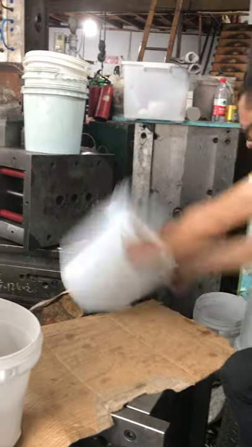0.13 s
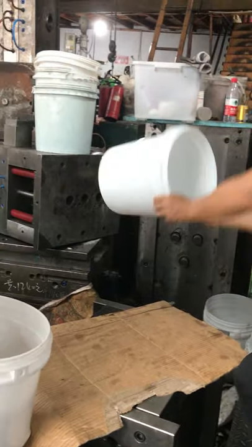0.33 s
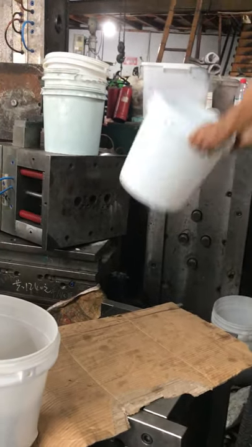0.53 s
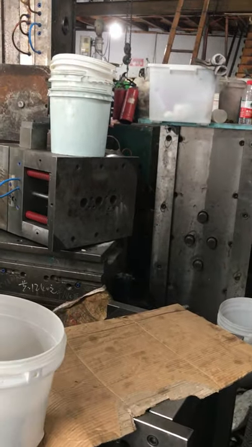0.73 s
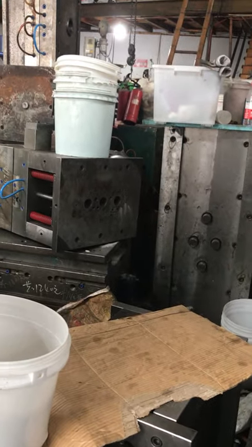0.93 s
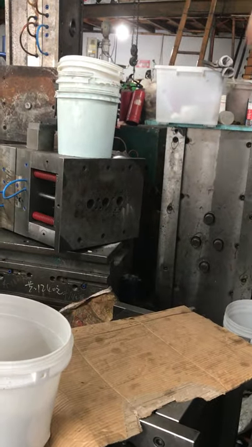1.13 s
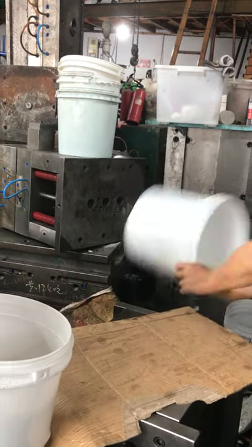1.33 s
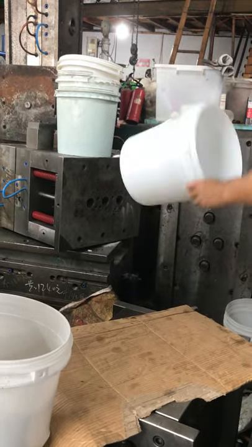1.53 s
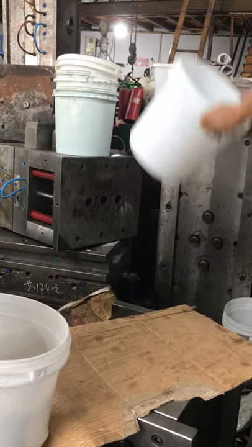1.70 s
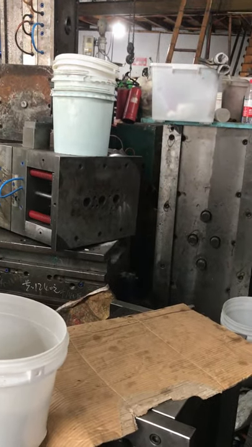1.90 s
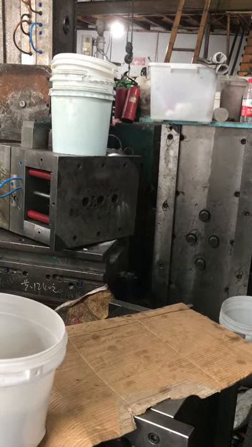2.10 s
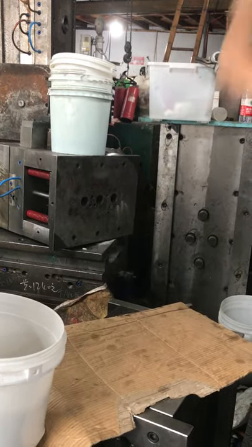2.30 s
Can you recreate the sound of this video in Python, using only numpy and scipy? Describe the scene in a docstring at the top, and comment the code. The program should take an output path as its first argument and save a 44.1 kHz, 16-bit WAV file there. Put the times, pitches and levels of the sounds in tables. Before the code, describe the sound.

An empty plastic bucket slams twice on a card-covered steel bench, each hit a sharp crack, clatter and hollow boom with a quick second bump, close to the microphone in a large, echoing workshop with humming machines.

```python
"""A plastic bucket is slammed twice on a card-covered steel bench in a large workshop. On each slam the hard rim
cracks, the walls clatter and the hollow booms, and the body touches again; all are ringing or swelling sines.
The hall answers with fading noise. Behind, machines hum, whine and hiss (shaped noise) and small squeaks sound.
The swing puffs air on the microphone, whose gain control ducks after each slam and whose peaks are limited."""
import sys
import numpy as np
from scipy import signal
from scipy.io import wavfile
from scipy.ndimage import uniform_filter1d, minimum_filter1d

SR = 44100
rng = np.random.default_rng(int(sys.argv[2]) if len(sys.argv) > 2 else 0)


def convert_level_to_amplitude(level_db):
    """Map a level in decibels to its linear amplitude factor."""
    exponent = np.asarray(level_db, float) / 20
    return 10 ** exponent


def to_wav(s):
    """Save 16-bit WAV."""
    ch = np.atleast_2d(s).T  # columns
    pcm = np.round(np.clip(ch, -1, 1) * 32767)  # PCM
    wavfile.write(sys.argv[1], SR, pcm.astype(np.int16))


N = 103635  # length in samples

# Broad machine noise: pitch_hz, level_db (per Hz, relative)
MACHINE_NOISE = [(15, -43), (25, -18.5), (58, 0), (192, -4), (259, -4), (296, -8), (433, -7), (568, -7),
                 (1280, -18), (2150, -18.5), (4480, -29.5), (4860, -28.5), (13600, -36.5), (15200, -33),
                 (16500, -66)]
# Narrow hums and whines: pitch_hz, width_hz, level_db
MACHINE_TONES = [(295.3, 13.4, -37.5), (587.6, 34, -38.5), (985, 90, -44), (1460, 41, -54), (1844, 23, -60),
                 (2155, 25, -52), (2370, 11, -57), (3178, 51, -54), (3637, 29, -54.5), (3898, 12, -55),
                 (4350, 11, -54.5), (4444, 10, -58), (5550, 16, -68), (6060, 30, -67.5), (8100, 33, -74),
                 (8600, 69, -64)]
# Slow rise and fall of the background level: time_s, level_db
BACKGROUND_LEVEL = [(0, 1), (.5, 1.5), (0.952, 0.5), (1.25, -0.5), (1.7, 1), (2.05, -1), (2.35, 0.5)]
MACHINE_NOISE_DB, PATCHY_DB, WAVER_DB = -32.5, 1.5, 1.0
HISS_TOP_HZ = 15900

# Small distant squeaks: middle_s, length_s, level_db, pitch_hz, waver_rad (phase)
SQUEAKS = [(0.134, 0.015, -43.5, 6800, 2.5), (0.13, 0.01, -42, 13600, 2.5), (0.615, .014, -41, 6170, .4),
           (0.722, 0.019, -37, 2350, .4), (1.324, .11, -39.5, 2300, 0.33),
           (1.327, 0.0075, -39.5, 7100, 2.5), (1.33, 0.011, -43, 13000, 2.5), (2.068, .015, -47, 5000, .4),
           (2.07, 0.02, -47, 8600, .4), (2.128, 0.022, -37, 3470, .4), (2.192, 0.07, -41, 3470, 0.35),
           (2.22, 0.023, -47, 5000, .4), (2.213, .02, -49, 8600, .4)]

# Air puffs on the microphone: middle_s, level_db, pitch_hz
PUFFS = [(1.27, -22, 77), (1.296, -17, 70), (1.313, -27, 71), (1.33, -17, 101)]
PUFF_LUMP, PUFF_LUMP_TOP_HZ = 0.42, 420  # share of rough air, and its top

# Colour of the hall's wash after a slam: pitch_hz, level_db (per Hz, relative)
HALL_COLOUR = [(24, -49), (40, -30), (151, -13), (262, -3), (412, -21), (896, -12.5), (1950, -22),
               (2630, -28.5), (2980, -26.5), (16000, -42)]
# Time the wash takes to fall 60 dB: pitch_hz, t60_s
HALL_FADE = [(60, 0.17), (240, 1.0), (1000, 0.81), (4000, 0.44), (15000, 0.38)]
# Colour of the slower tail from the far end of the hall: pitch_hz, level_db (per Hz, relative)
FAR_COLOUR = [(88, -63), (150, -20), (236, 0), (299, -28), (326, 10), (425, -44), (493, -23), (1100, 0.5),
              (3000, -39), (3900, -67), (6600, -120)]
HALL_DB, HALL_RISE_S = -14, 0.0023
FAR_DB, FAR_T60_S, ECHO_RISE_S = -29, 2.45, 0.09
BOOM_ECHO_HZ, BOOM_ECHO_WIDTH_HZ, BOOM_ECHO_DB, BOOM_ECHO_T60_S = 244.3, 19.7, -17, 1.48

# Body landings on the bench: start_s, blow_db (on the walls), soft_hz (contact dulls above this),
# boom_db, boom_rise_s, boom_hold_s, boom_hz (where the pitch settles)
LANDINGS = [(0.2459, 2, 3900, 1.5, 0.012, 0.031, 230.2), (.2970, -9.5, 1110, 3.5, 0.0037, 0.026, 237.4),
            (1.3800, -16, 600, -32, .01, .005, 240), (1.3900, 0.5, 4160, 0, 0.03, 0.013, 233),
            (1.453, -6.5, 785, 1.5, 0.013, 0.015, 236.5)]
BOOM_T60_S, BOOM_START_SHARP, BOOM_SETTLE_S = 0.059, 0.23, 0.0073  # sharpness as a share of the pitch

# Ringing modes of the bucket wall: pitch_hz, level_db, t60_s
WALL_MODES = [(135, -12.5, 0.13), (345, -9.5, 0.11), (420, -5, 0.049), (505, -13, .08), (546, -7.5, 0.051),
              (700.3, -2.5, 0.066), (798, -10, 0.16), (923, 0, 0.022), (1075, -7, 0.073), (1272, -20, .08),
              (1477, -9.5, 0.051), (1740, -13.5, 0.028), (1930, -19, 0.068), (2300, -9.5, 0.021),
              (2908, -15.5, 0.038)]
RATTLE_PER_S, RATTLE_DB, RATTLE_T60_S = 900, -9.5, 0.17

# Snaps of the hard edge: start_s, level_db
CRACKS = [(.2472, 8), (.2475, 4), (.2502, 4), (.2595, -7), (1.3899, 7), (1.3904, 8), (1.3927, 5),
          (1.3934, 0), (1.3990, -9)]
# Ringing modes of the rim: pitch_hz, level_db, t60_s
RIM_MODES = [(3470, 0, 0.0016), (5200, 1.5, 0.0016), (6800, 2, 0.0015), (8600, 0, 0.0013),
             (11340, -5.5, 0.0022), (12540, -2.5, 0.0013), (14800, -9, 0.0043)]
CHATTER_PER_S, CHATTER_DB, CHATTER_T60_S = 3300, -46, 0.24

DUCK_FROM_DB, DUCK_MAX_DB, DUCK_ATTACK_S = -12, 10, 0.058
DUCK_HOLD_S, RECOVER_DB_PER_S = 0.33, 24.5
CEILING, LIMIT_SMOOTH_S = 0.7, 0.0012


def rms_one(x):
    """Scale to an rms of 1."""
    return x / np.sqrt(np.mean(x ** 2) + 1e-20)


def at_hz(points, hz):
    """Read a table between its points, on a log-frequency axis."""
    table = np.array(points)
    return np.interp(np.log(hz), np.log(table[:, 0]), table[:, 1])


def since(s):
    """Seconds passed since s, zero before."""
    return np.maximum(np.arange(N) / SR - s, 0)


def drift(rate_hz):
    """Slow random wandering with rms 1: low-passed noise, made at every 40th sample."""
    r = np.exp(-80 * np.pi * rate_hz / SR)
    noise = rng.standard_normal(N // 40 + 2002)
    slow = signal.lfilter([1], [1, -2 * r, r * r], noise)[2000:]  # skip the filter's start
    return np.interp(np.arange(N) / 40, np.arange(len(slow)), rms_one(slow))


def ring(x, hz, t60):
    """A resonance: a unit click sets off a sine of starting height 1 that falls 60 dB in t60 seconds."""
    r = 10 ** (-3 / (t60 * SR))
    w = 2 * np.pi * hz / SR
    return signal.lfilter([0, np.sin(w)], [1, -2 * r * np.cos(w), r * r], x + 1e-18)


def narrow(hz, width_hz):
    """Noise through one resonance, rms 1; a narrower resonance rings longer."""
    noise = rng.standard_normal(N + 9000)
    return rms_one(ring(noise, hz, 2.2 / width_hz)[9000:])


def bands(spectrum):
    """Third-octave noise bands with their centres, together of spread 1."""
    edges = 25 * 2 ** (np.arange(29) / 3)
    centres = np.sqrt(edges[1:] * edges[:-1])
    white = rng.standard_normal((2, N))
    out = []
    for k, hz in enumerate(centres):
        band_pass = signal.butter(2, edges[k:k + 2], "band", fs=SR, output="sos")
        # neighbouring bands take different noise
        out.append(convert_level_to_amplitude(at_hz(spectrum, hz)) * signal.sosfilt(band_pass, white[k % 2]))
    return centres, np.array(out) / np.std(np.sum(out, axis=0))


def machines():
    """Patchy broad noise, steadier in the treble, with hums and whines that waver in level."""
    together = drift(5)
    centres, noise = bands(MACHINE_NOISE)
    broad = 0
    for hz, band in zip(centres, noise):
        patchy = PATCHY_DB * (together / 2 + drift(6.9)) * np.clip(2500 / hz, 0.3, 1)
        broad = broad + band * convert_level_to_amplitude(patchy)
    broad = signal.sosfilt(signal.cheby2(12, 40, HISS_TOP_HZ, fs=SR, output="sos"), broad)
    tones = sum(convert_level_to_amplitude(db + WAVER_DB * drift(9.6)) * narrow(hz, width) for hz, width, db in MACHINE_TONES)
    level_db = np.interp(np.arange(N) / SR, *np.transpose(BACKGROUND_LEVEL))
    return convert_level_to_amplitude(level_db) * (convert_level_to_amplitude(MACHINE_NOISE_DB) * broad + tones)


def squeaks():
    """Short sines that swell and fade; random phase wandering smears the pitch of the rough ones."""
    t = np.arange(N) / SR
    out = 0
    for middle, length, db, hz, waver in SQUEAKS:
        swell = np.cos(np.pi * np.clip((t - middle) / length, -0.5, 0.5))
        out = out + convert_level_to_amplitude(db) * swell * np.sin(2 * np.pi * hz * t + waver * drift(120))
    return out


def puffs():
    """Each gust pushes the microphone through one low swing, made lumpy by low-passed noise."""
    low_pass = signal.butter(2, PUFF_LUMP_TOP_HZ, fs=SR, output="sos")
    lump = PUFF_LUMP * rms_one(signal.sosfilt(low_pass, rng.standard_normal(N)))
    out = 0
    for middle, db, hz in PUFFS:
        cycle = since(middle - 0.5 / hz) * hz
        swell = (cycle < 1) * np.sin(np.pi * cycle)
        out = out + convert_level_to_amplitude(db) * swell * (lump - np.sin(2 * np.pi * cycle))
    return out


def dying(t60, rise, hz):
    """Loudness of the hall at one pitch: the fading energies of all landings add up."""
    energy = 0
    for s, db, soft_hz, *_ in LANDINGS:
        t = since(s)
        level = convert_level_to_amplitude(db - 60 * t / t60) * (1 - np.exp(-t / rise))
        energy = energy + level ** 2 / (1 + (hz / soft_hz) ** 2 / 4)  # soft contacts send less treble
    return np.sqrt(energy)


def hall():
    """Diffuse noise dies band by band, with a longer echo at the boom pitch and a slow far tail."""
    wash = 0
    for hz, band in zip(*bands(HALL_COLOUR)):
        wash = wash + band * dying(at_hz(HALL_FADE, hz), HALL_RISE_S, min(hz, 3000))
    far = bands(FAR_COLOUR)[1].sum(axis=0) * dying(FAR_T60_S, ECHO_RISE_S, BOOM_ECHO_HZ)
    echo = narrow(BOOM_ECHO_HZ, BOOM_ECHO_WIDTH_HZ) * dying(BOOM_ECHO_T60_S, ECHO_RISE_S, BOOM_ECHO_HZ)
    return convert_level_to_amplitude(FAR_DB) * far + convert_level_to_amplitude(HALL_DB) * wash + convert_level_to_amplitude(BOOM_ECHO_DB) * echo


def boom():
    """The hollow swells, holds while pressed on the bench, then is damped; its pitch starts sharp."""
    out = 0
    for s, _, _, db, rise, hold, hz in LANDINGS:
        t = since(s)
        extra_s = BOOM_START_SHARP * BOOM_SETTLE_S * (1 - np.exp(-t / BOOM_SETTLE_S))
        cycles = hz * (t + extra_s)
        swell = np.sin(np.pi / 2 * np.minimum(t / rise, 1)) ** 2
        fade_db = 60 * np.maximum(t - rise - hold, 0) / BOOM_T60_S
        out = out + swell * convert_level_to_amplitude(db - fade_db) * np.sin(2 * np.pi * cycles)
    return out


def walls():
    """Each landing strikes the wall modes, softer contacts more dully; a dying rattle keeps them going."""
    blows = np.zeros((len(LANDINGS), N))
    loose = (rng.random(N) < RATTLE_PER_S / SR) * rng.standard_normal(N)
    for k, (s, db, *_) in enumerate(LANDINGS):
        t = since(s)
        blows[k, int(s * SR)] = convert_level_to_amplitude(db)
        blows[k] += (t > 0) * loose * convert_level_to_amplitude(db + RATTLE_DB - 60 * t / RATTLE_T60_S)
    soft_hz = np.array(LANDINGS)[:, 2]
    out = 0
    for k, (hz, db, t60) in enumerate(WALL_MODES):
        chance = convert_level_to_amplitude(rng.normal(0, 2.2, len(blows)))  # each landing hits each mode a little differently
        strike = chance / (1 + (hz / soft_hz) ** 2) @ blows
        out = out + (-1) ** k * convert_level_to_amplitude(db) * ring(strike, hz, t60)
    return out


def cracks():
    """The hard edge snaps against the bench, then chatters in small grains; both ring the rim modes."""
    clicks = np.zeros(N)
    grains = (rng.random(N) < CHATTER_PER_S / SR) * rng.standard_normal(N)
    for s, db in CRACKS:
        t = since(s)
        clicks[int(s * SR)] -= convert_level_to_amplitude(db)
        clicks += grains * (t > 0) * convert_level_to_amplitude(db + CHATTER_DB - 60 * t / CHATTER_T60_S)
    out = 0
    for k, (hz, db, t60) in enumerate(RIM_MODES):
        out = out + (-1) ** k * convert_level_to_amplitude(db) * ring(clicks, hz, t60)
    return out


def scene():
    """Everything adds up at one microphone."""
    background = machines() + squeaks() + puffs()
    bucket = boom() + walls() + cracks()
    return (background + hall() + bucket)[None]


def top_cut(x):
    """Nothing passes above the cut-off."""
    return signal.sosfilt(signal.butter(12, 16670, fs=SR, output="sos"), x)


def record(dry):
    """Slow gain control ducks, holds and recovers; a fast look-ahead limiter caps the peaks."""
    x = dry[0]
    t = np.arange(N) / SR
    power = np.abs(uniform_filter1d(x ** 2, size=441))  # averaged over 10 ms
    level_db = 10 * np.log10(power + 1e-12)
    cut_db = np.clip(level_db - DUCK_FROM_DB, 0, DUCK_MAX_DB)
    # hold the deepest cut of the time just past
    hold = int(DUCK_HOLD_S * SR)
    held = -minimum_filter1d(-np.pad(cut_db, (hold, 0)), size=2 * (hold // 2) + 1)
    cut_db = held[hold - hold // 2:][:N]
    # let the cut fall back no faster than the recovery rate
    cut_db = np.maximum.accumulate(cut_db + RECOVER_DB_PER_S * t) - RECOVER_DB_PER_S * t
    r = np.exp(-1 / (DUCK_ATTACK_S * SR))
    x = x * convert_level_to_amplitude(-signal.lfilter([1 - r], [1, -r], cut_db))
    span = int(LIMIT_SMOOTH_S * SR) + 1
    needed = np.minimum(1, CEILING / (np.abs(x) + 1e-9))
    gain = uniform_filter1d(minimum_filter1d(needed, size=span), size=span)
    return top_cut((x * gain)[None])


dry = scene()
out = record(dry)
to_wav(out)
```